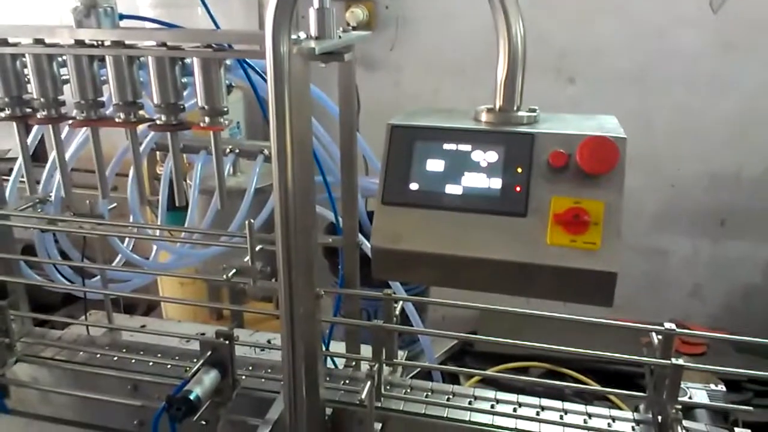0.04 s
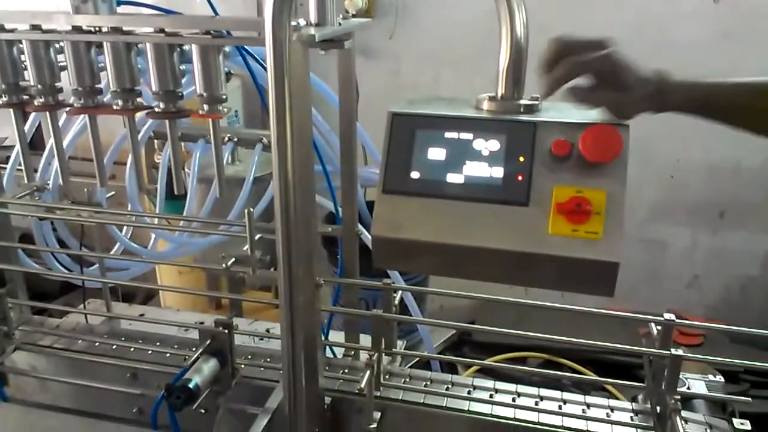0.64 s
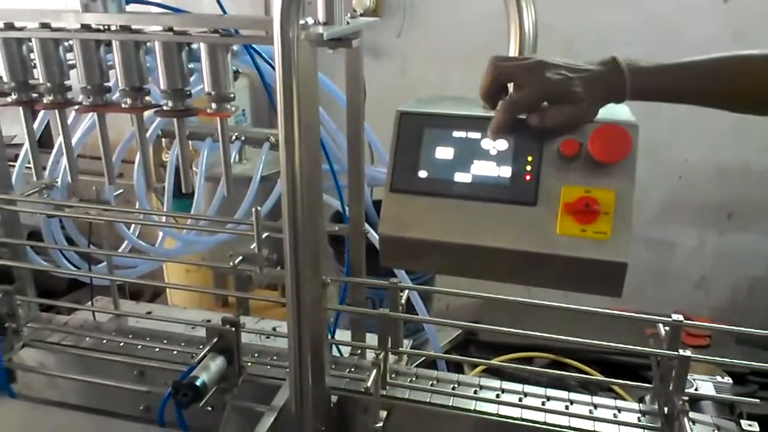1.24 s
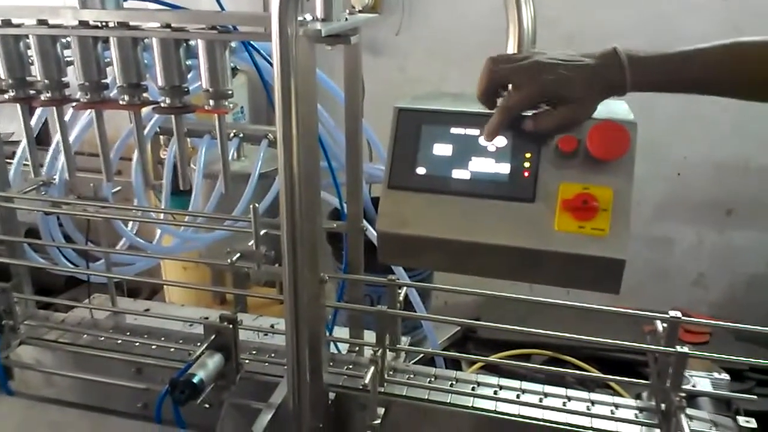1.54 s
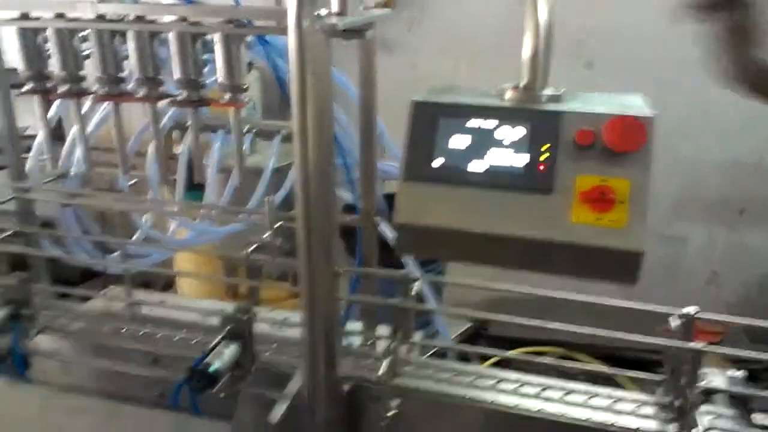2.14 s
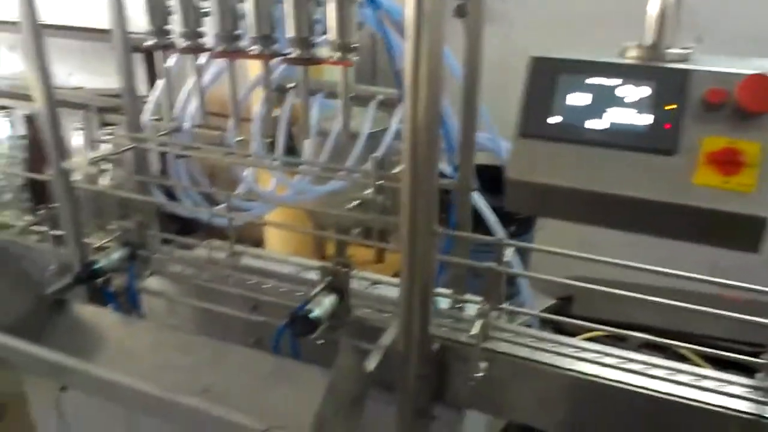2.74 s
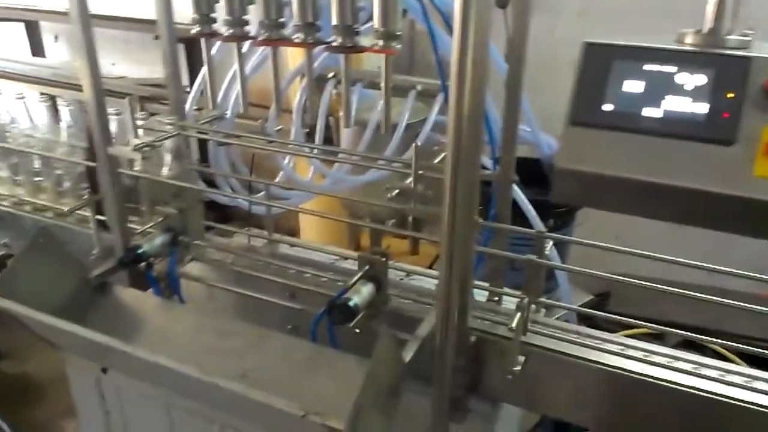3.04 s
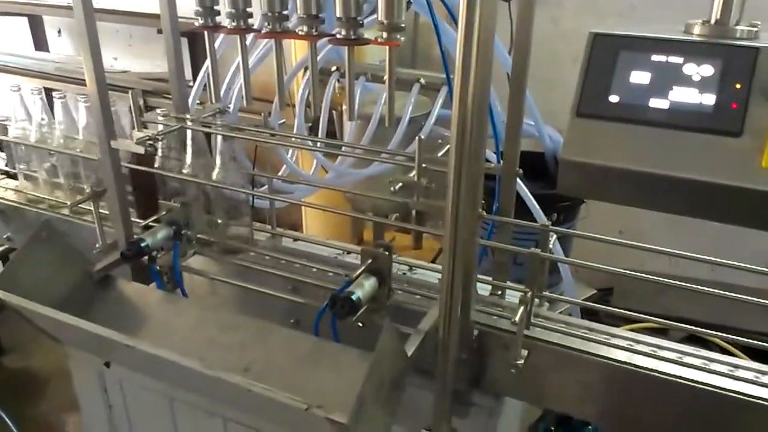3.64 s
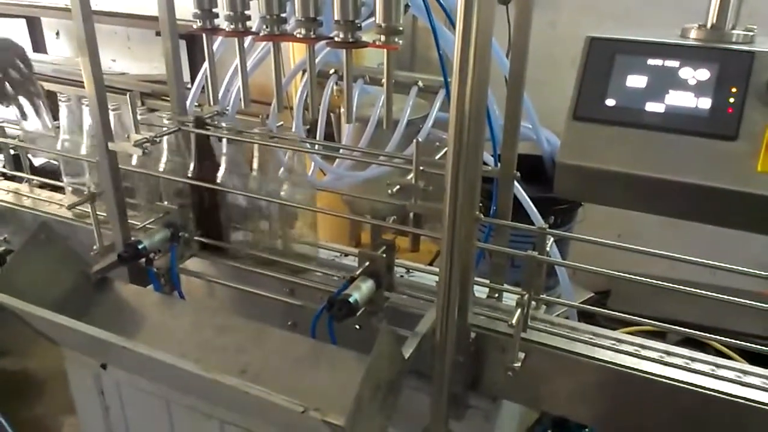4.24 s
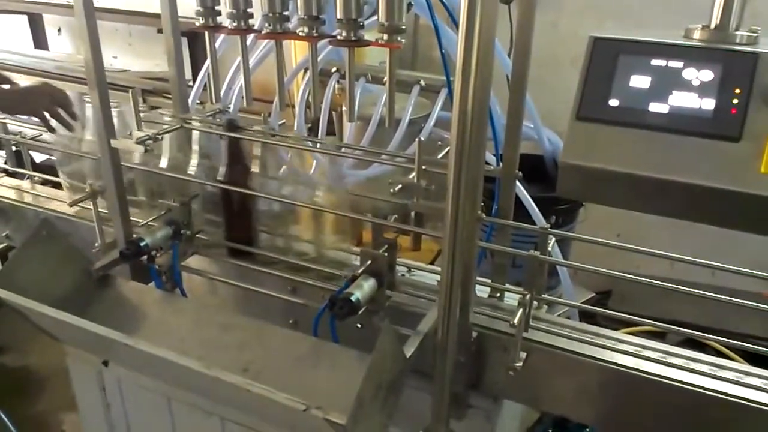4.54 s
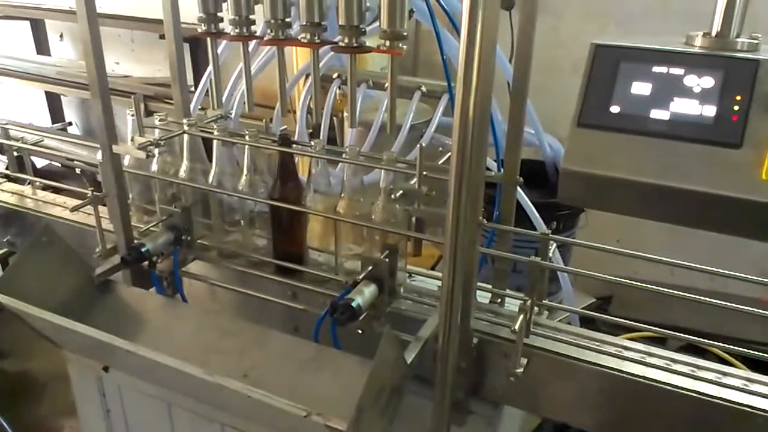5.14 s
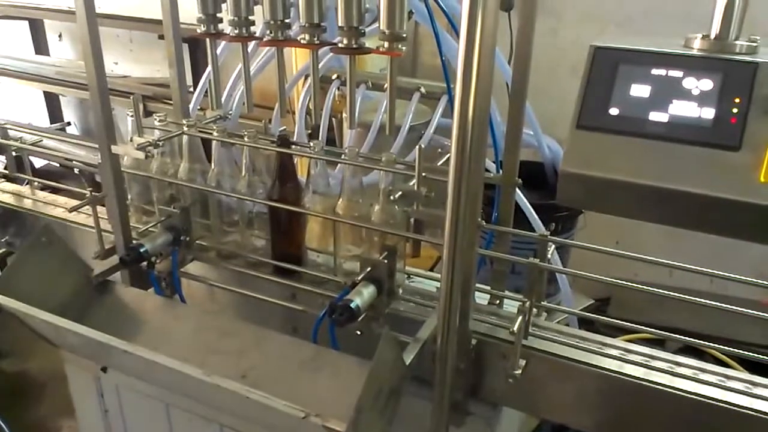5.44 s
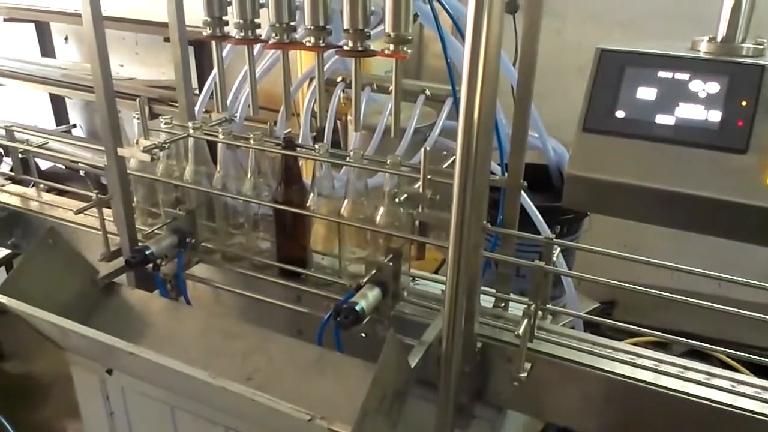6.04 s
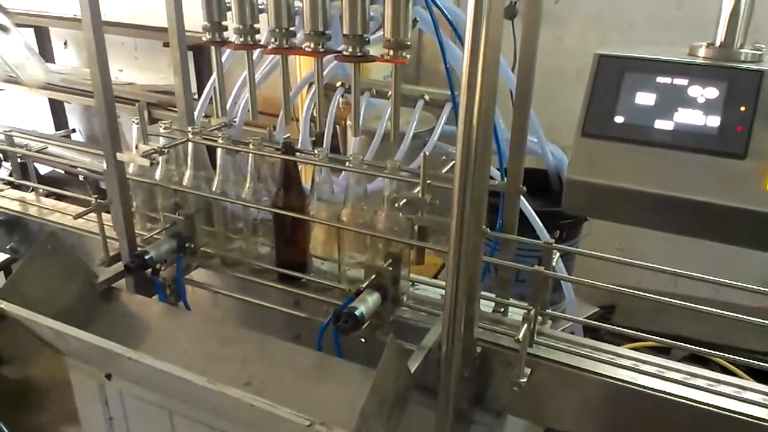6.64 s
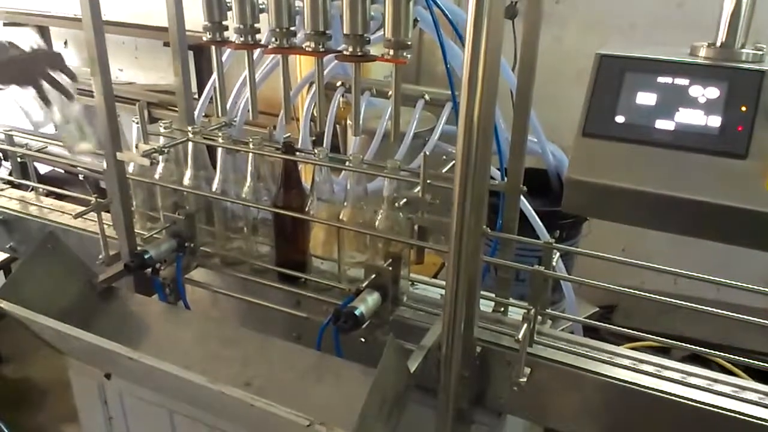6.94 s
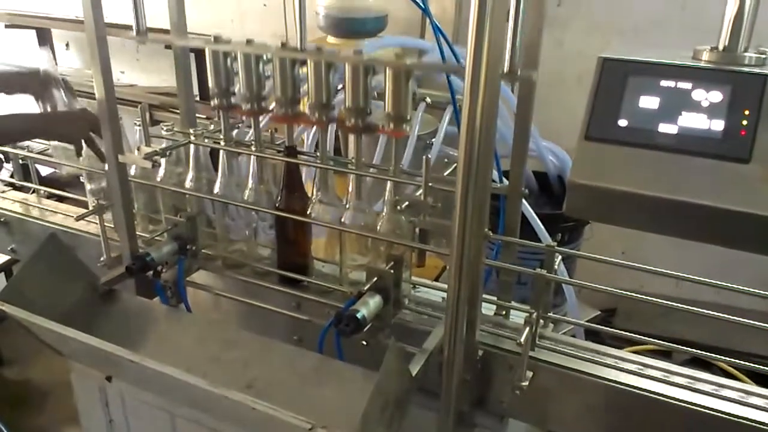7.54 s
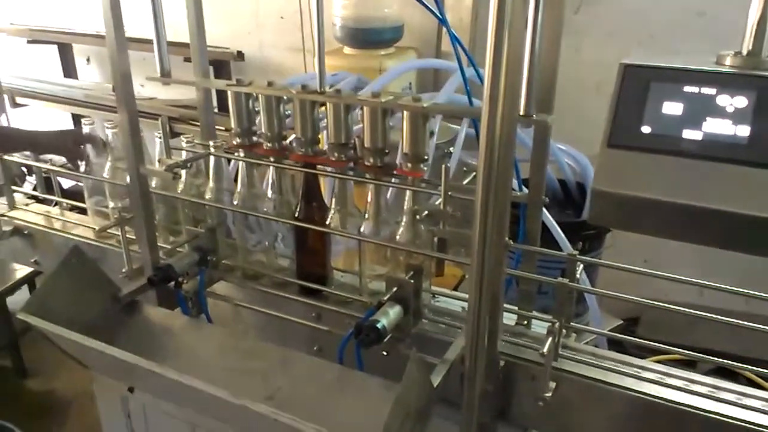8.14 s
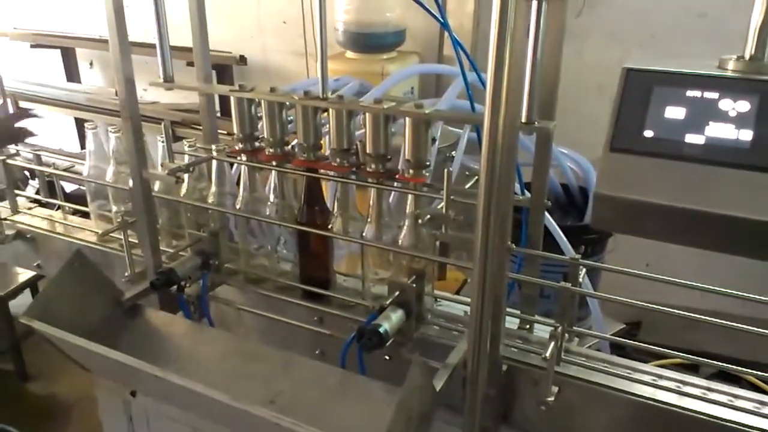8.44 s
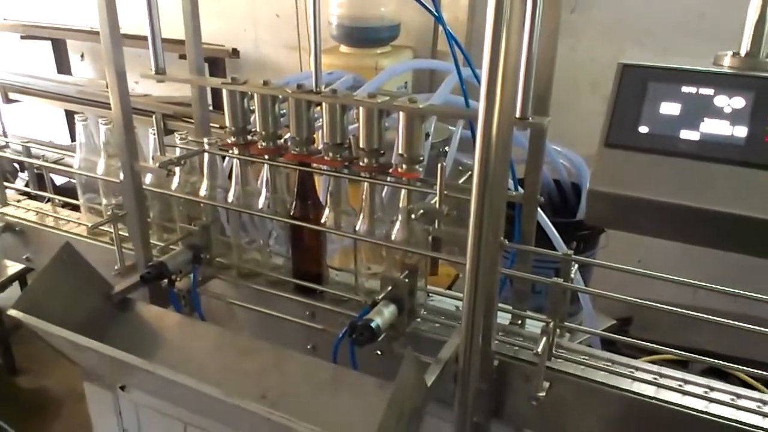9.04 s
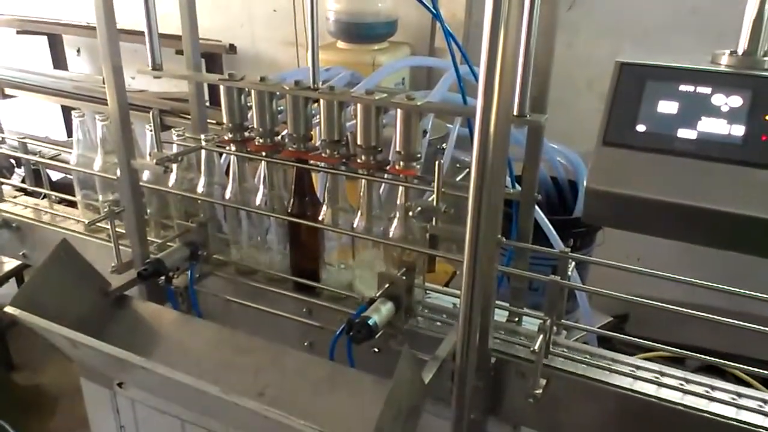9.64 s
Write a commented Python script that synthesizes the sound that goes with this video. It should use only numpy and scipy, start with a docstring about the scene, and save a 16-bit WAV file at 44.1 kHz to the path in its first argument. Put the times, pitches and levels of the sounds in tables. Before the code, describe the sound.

A loud, high, fluttering hiss of compressed air runs throughout, heard on one microphone beside a bottle filling machine, with a low hum and dull factory wash beneath. A conveyor eases into a soft rattle and bottles jostle faintly. Around the middle, cylinders vent twice with a shrill whistle. Later come brief clinks and spits of air, then two more exhausts with a low rumble, while the overall level stays even.

```python
"""A factory hall, close to a bottle filling machine, on one microphone.
Air hisses loudly, fluttering with the strokes of a pump, over the low hum of its motor.
The conveyor gathers speed, bottles knock along its rails, and pneumatic cylinders vent
as the gates and the nozzle bar move. A fast limiter holds the level."""
import sys
import numpy as np
from scipy import signal
from scipy.fft import rfft, irfft
from scipy.io import wavfile

SR = 44100
rng = np.random.default_rng(int(sys.argv[2]) if len(sys.argv) > 2 else 0)


def wav_record(signal):
    """Record a signal, one row per channel, as 16-bit PCM in the file named by sys.argv[1]."""
    frames = np.transpose(np.atleast_2d(signal))
    bounded = np.clip(frames, -1, 1)
    # unit amplitude maps onto the largest positive 16-bit level
    quanta = np.round(bounded * 32767).astype(np.int16)
    wavfile.write(sys.argv[1], SR, quanta)


N = 435266
T, HZ = np.arange(N) / SR, np.fft.rfftfreq(N, 1 / SR)
BELT_START_S = 2.42

# conveyor frame resonances: f/Hz, width/Hz, lift/dB
FRAME_MODES = [(124, 10, 5.7), (425, 33, 4.9), (591, 26, 5.9), (950, 60, 2.7), (1366, 47, 1)]


def gain_of(db):
    """Decibels to gain."""
    return 10 ** (np.asarray(db) / 20)


def unit_rms(x):
    """x scaled to rms 1."""
    return x / np.sqrt(np.mean(x ** 2) + 1e-20)


def white():
    """White noise, scene length."""
    return rng.standard_normal(N)


def slope(points):
    """Spectrum in dB, linear between points over log frequency."""
    hz, db = np.transpose(points)
    return np.interp(np.log(HZ + 1), np.log(hz + 1), db)


def lifts(peaks):
    """Resonant bumps in dB, to add to a spectrum."""
    return sum(db / (1 + (2 * (HZ - hz) / width) ** 2) for hz, width, db in peaks)


def bands(peaks):
    """Spectrum in dB of steep resonances alone."""
    power = sum(gain_of(db) ** 2 / (1 + (2 * (HZ - hz) / width) ** 2) ** 3 for hz, width, db in peaks)
    return 10 * np.log10(power)


def colour(x, db):
    """x filtered by a spectrum in dB; rms 1."""
    return unit_rms(irfft(rfft(x) * gain_of(db), N))


def drift(rate_hz):
    """Slow random wander; rms 1."""
    return unit_rms(irfft(rfft(white()) * np.exp(-(HZ / rate_hz) ** 2) * (HZ > 0), N))


def scatter(x, t60_s, direct, comb=.65):
    """Direct sound plus dense reflections among the steel parts; rms 1."""
    tail = white() * gain_of(-60 * T / t60_s)
    path = np.sqrt(direct) + np.sqrt(1 - direct) * rfft(tail) / np.linalg.norm(tail)
    path *= (abs(path) + 1e-9) ** (comb - 1)  # a broad source fills the deepest notches
    return unit_rms(irfft(rfft(x) * path, N))


def hall(level_db=-41):
    """Dull, steady factory wash, coloured by the machine housing."""
    wash = [(20, -14), (50, -2), (120, -3), (240, 5), (300, -1), (380, -13), (490, -9), (640, 3), (1300, 3),
            (2200, 8), (4000, -21)]  # spectrum: f/Hz, level/dB
    housing_modes = [(124, 8.3, 12.5), (710, 44, 3.5), (894, 46, 3), (1292, 70, 8.5), (1774, 110, 4.5)]  # f/Hz, width/Hz, lift/dB
    return gain_of(level_db) * colour(white(), slope(wash) + lifts(housing_modes))


def motor(turns, waver=.14):
    """Hum at low shaft orders, wavering a little."""
    orders = [(2, -67), (8, -52), (12, -60)]  # multiple of shaft speed, level/dB
    out = np.zeros(N)
    for order, db in orders:
        amplitude = gain_of(db) * np.sqrt(2) * (1 + waver * drift(5.1))
        out += amplitude * np.sin(2 * np.pi * (order * turns + rng.random()))
    return out


def belt_speed(run_up_s=.87):
    """Conveyor speed, easing from 0 at rest to 1."""
    return 1 - np.exp(-np.maximum(T - BELT_START_S, 0) / run_up_s)


def conveyor(running_db=-38.5, ticks_per_s=70, rattle=.54, uneven_db=1):
    """The chain slides unevenly and its links tick into the steel frame, louder with speed."""
    chain = [(25, -9), (70, -4.5), (160, -6), (320, 2.5), (800, 0.5), (1500, 0), (2200, -0.5), (4000, -36)]  # spectrum: f/Hz, level/dB
    # brief, faint swells of low noise, the first before the belt starts: t/s, half width/s, level/dB
    swells = [(1.08, 0.21, -47), (8.07, 0.2, -43.5)]
    ticks = (rng.random(N) < ticks_per_s / SR) * white()
    drive = white() + rattle * scatter(ticks, t60_s=.14, direct=.063)
    swell = sum(gain_of(db) * np.exp(-((T - s) / width) ** 2) for s, width, db in swells)
    level = (gain_of(running_db) * belt_speed() + swell) * gain_of(uneven_db * drift(12))
    return level * colour(drive, slope(chain) + lifts(FRAME_MODES))


def bursts(rows, body_db, t60_s, room_db, room_t60_s, skirt_db):
    """Short band-noise bursts with the hall's tail; rows: t/s, level/dB, f/Hz, rise/s."""
    out = np.zeros(N + SR)
    age, hz = T[:SR], np.fft.rfftfreq(SR, 1 / SR)
    fade = gain_of(-60 * age / t60_s) + gain_of(room_db - 60 * age / room_t60_s)
    body = np.interp(hz, HZ, body_db + np.zeros(len(HZ)))
    for s, db, centre, rise in rows:
        shape = gain_of(body - skirt_db * np.log2((hz + 1) / centre) ** 2)
        noise = unit_rms(irfft(rfft(rng.standard_normal(SR)) * shape, SR))
        out[round(s * SR):][:SR] += gain_of(db) * (1 - np.exp(-age / rise)) * fade * noise
    return out[:N]


def jostles(count=60, per_s=2.5, level_db=-43.5, spread_db=1, centre_hz=1000, rise_s=.002):
    """Burst rows for light random bottle contacts, louder with belt speed."""
    gap, softness, pitch = rng.random((count, 3)).T
    times = BELT_START_S + np.cumsum(.5 + gap) / per_s
    speed_db = 20 * np.log10(np.interp(times, T, belt_speed()) + 1e-6)
    levels = level_db - spread_db * (2 * softness - 1) + speed_db
    centres = centre_hz * 2 ** (pitch - .5)
    return [(s, db, hz, rise_s) for s, db, hz in zip(times, levels, centres) if s < T[-1]]


def bottles(rise_cycles=7.5, max_rise_s=.028):
    """Knocks and jostles ring the conveyor frame; heavy parts answer more slowly."""
    knocks = [(1.690, -37, 1200), (1.715, -40.5, 600), (1.80, -47, 180), (3.10, -39, 650), (3.84, -44, 75),
              (4.26, -37, 900), (4.74, -34.5, 700), (7.221, -38, 105), (8.138, -34, 1100),
              (9.47, -36, 1600), (9.667, -33, 1110)]  # bottles and machine parts: t/s, level/dB, f/Hz
    loud = [(s, db, hz, min(rise_cycles / hz, max_rise_s)) for s, db, hz in knocks]
    return bursts(loud + jostles(), lifts(FRAME_MODES),
                  t60_s=.059, room_db=3, room_t60_s=.51, skirt_db=4.5)


def clinks():
    """Bright clinks and spits of air."""
    events = [(3.62, -24, 9000, .002), (7.025, -26, 7000, .002), (7.06, -20, 8500, .02),
              (7.085, -19, 4700, 0.024), (7.12, -21, 4400, 0.019)]  # t/s, level/dB, f/Hz, rise/s
    return bursts(events, body_db=0, t60_s=.06, room_db=.5, room_t60_s=.32, skirt_db=12)


def exhausts(attack_s=.0015, vent_t60_s=.87, rumble_s=.021, ring_t60_s=.62, sputter_db=.5, stutter_db=3):
    """A valve opens: air rushes out, rumble builds, the port's whistle catches, pressure dies."""
    # t/s, open/s, whistle delay/s, rush/dB, rumble/dB, whistle/dB, shrill/dB, ring/dB
    vents = [(2.30, .03, 0.05, -60, -68, -35, -50, -55), (4.515, 0.044, 0.035, -32.5, -58, -25.5, -26, -45),
             (5.093, 0.16, 0.13, -25, -39.5, -17.5, -16.8, -40),
             (7.143, 0.1, 0.068, -27, -27, -22.5, -20.5, -21),
             (7.669, 0.036, 0.047, -24, -30, -29, -27, -19)]
    # broad spectra: f/Hz, level/dB
    rush = [(100, -17), (500, -13.5), (1200, -2), (2000, -1), (3300, -6), (8000, -29), (15000, -24)]
    rumble = [(30, -26), (70, -19), (100, 6), (160, -1), (400, 8.5), (800, 5.5), (1600, -13), (4000, -17)]
    # port resonances: f/Hz, width/Hz, level/dB
    whistle = [(2548, 87, -1), (2653, 150, -4.5)]
    shrill = [(4056, 220, -3), (4470, 520, -4), (4870, 220, -6)]
    ring = [(4090, 250, -6), (7880, 290, 0)]
    spectra = [slope(rush), slope(rumble), bands(whistle), bands(shrill), bands(ring)]
    voices = [colour(white(), db) for db in spectra]
    stutter = gain_of(stutter_db * drift(44))
    out = np.zeros(N)
    for s, open_s, delay_s, *levels in vents:
        age = np.maximum(T - s, 0)
        emptying = gain_of(-60 * np.maximum(age - open_s, 0) / vent_t60_s)
        pressure = (1 - np.exp(-age / attack_s)) * emptying
        rumble_env = 1 - np.exp(-age / rumble_s)
        whistle_env = stutter * np.interp(age, [delay_s / 2, delay_s], [.3, 1])
        shrill_env = np.sqrt(pressure)  # needs high pressure, so dies early
        ring_env = gain_of(-60 * age / ring_t60_s)
        envelopes = [1, rumble_env, whistle_env, shrill_env, ring_env]
        out += pressure * sum(gain_of(db) * env * voice for db, env, voice in zip(levels, envelopes, voices))
    return out * gain_of(sputter_db * drift(45))


def pump_stroke(turns, jitter_s=.0003):
    """One sharp puff a turn, slightly early or late, echoing along its own path."""
    at = np.flatnonzero(np.diff(np.floor(turns)) > 0)
    late, polarity = rng.standard_normal((len(at), 2)).T
    puffs = np.zeros(N)
    puffs[np.clip(at + (late * jitter_s * SR).astype(int), 0, N - 1)] = np.sign(polarity)
    return scatter(puffs, t60_s=.14, direct=.02)


def air_hiss(turns, level_db=-14.5, pulsed_share=.4, second_db=-1, surge=.036, flicker_db=.97):
    """Two pump strokes a turn ride on a jet that surges with them."""
    hiss = [(500, -65), (2300, -28.5), (2700, -19.5), (3400, -19.5), (4200, -12.5), (5100, -11.5),
            (5500, -7), (6350, -0.8), (6950, -5), (7800, -10), (9200, -15), (10400, -16), (11400, -21),
            (15700, -21.3)]  # spectrum: f/Hz, level/dB
    fitting_modes = [(2507, 115, 9.8), (3053, 170, 5), (3586, 45, 7.5), (3953, 30, 5), (4922, 55, 4),
                     (5399, 180, 7.7), (5833, 130, 4.5), (6175, 85, 4), (6473, 180, 3.5), (8600, 170, 3),
                     (12080, 300, 5.5)]  # air fittings: f/Hz, width/Hz, lift/dB
    panel_modes = [(2450, 63, 6.5), (7450, 300, 6.5), (8750, 300, 6.5), (12700, 300, -3)]  # in front of the control panel: f/Hz, width/Hz, lift/dB
    mic_track = [(2.2, 0.68), (3.3, 0.066)]  # t/s, position (1 = panel, 0 = nozzles)
    dips = [(1.572, 4.5, .008), (3.355, 2, 0.0089), (8.63, 4, 0.0061)]  # brief level dips: t/s, depth/dB, half width/s
    strokes = unit_rms(pump_stroke(turns - .6) + gain_of(second_db) * pump_stroke(turns - .1))
    flow = scatter(white(), t60_s=.38, direct=.17) * (1 + surge * np.sin(4 * np.pi * (turns - .05)))
    jet = np.sqrt(pulsed_share) * strokes + np.sqrt(1 - pulsed_share) * flow
    tone_db = slope(hiss) + lifts(fitting_modes)
    at_panel, at_nozzles = colour(jet, tone_db + lifts(panel_modes)), colour(jet, tone_db)
    position = np.interp(T, *np.transpose(mic_track))
    heard = position * at_panel + (1 - position) * at_nozzles
    dip_db = sum(db * np.exp(-((T - s) / width) ** 2) for s, db, width in dips)
    return gain_of(level_db - dip_db + flicker_db * drift(30)) * heard


def scene(shaft_hz=22.953):
    """All sources on one microphone; pump and motor share a shaft."""
    turns = shaft_hz * T + .012 * drift(.5)
    mix = air_hiss(turns) + motor(turns) + hall() + conveyor() + exhausts() + clinks() + bottles()
    return np.stack([mix, mix])


def record(dry, threshold_db=-18, squeeze=.89, sense_s=.0015, makeup_db=2.5, cutoff_hz=15800):
    """A fast limiter flattens the hiss and ducks it under each exhaust; then a steep low-pass."""
    pole = np.exp(-1 / (sense_s * SR))
    power = signal.lfilter([1 - pole], [1, -pole], dry[0] ** 2, zi=[np.mean(dry ** 2)])[0]
    over_db = np.maximum(10 * np.log10(power + 1e-12) - threshold_db, 0)
    limited = dry * gain_of(makeup_db - squeeze * over_db)
    lowpass = signal.firwin(511, cutoff_hz, window=("kaiser", 9), fs=SR)
    return signal.oaconvolve(limited, lowpass[None], "same", axes=1)


dry = scene()
out = record(dry)
wav_record(out)
```